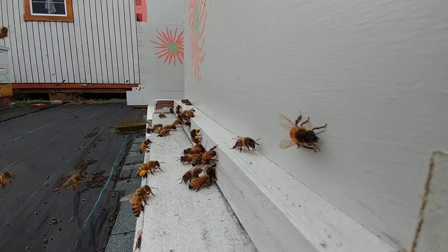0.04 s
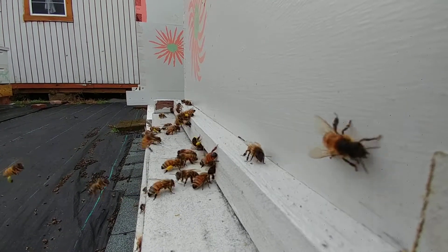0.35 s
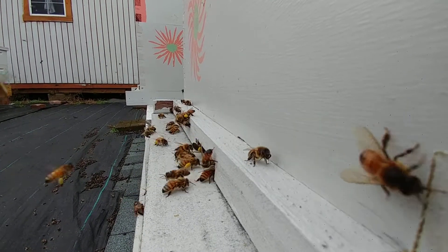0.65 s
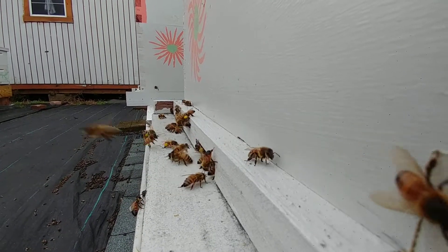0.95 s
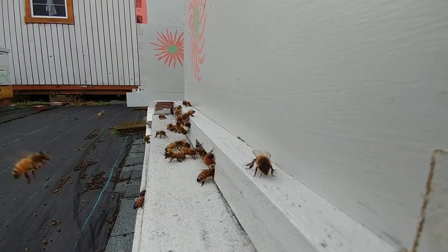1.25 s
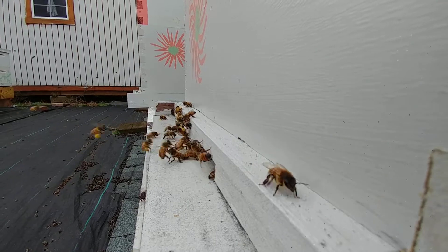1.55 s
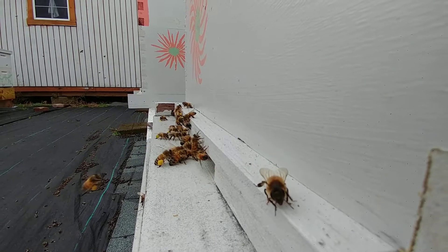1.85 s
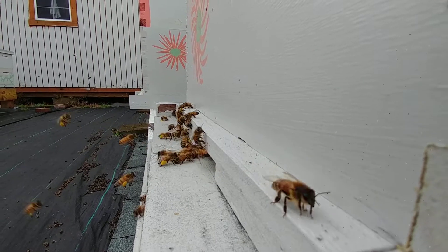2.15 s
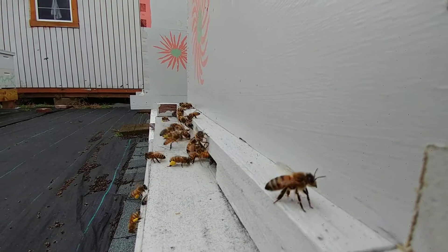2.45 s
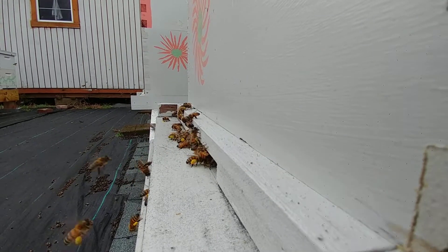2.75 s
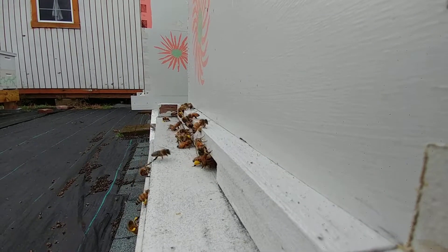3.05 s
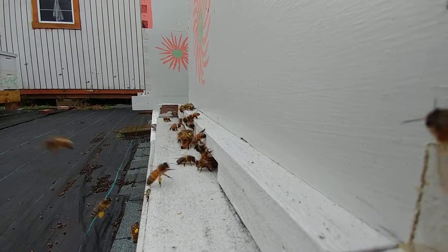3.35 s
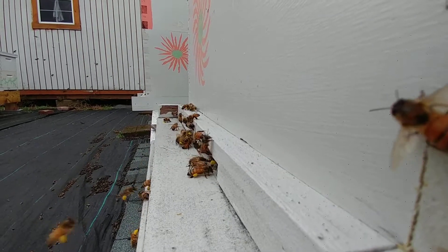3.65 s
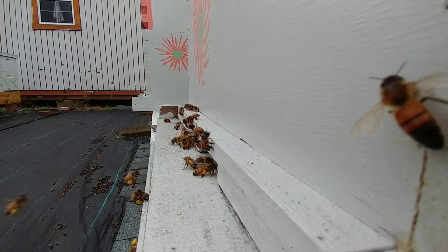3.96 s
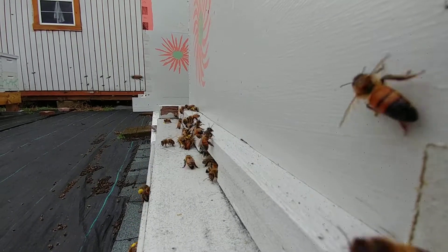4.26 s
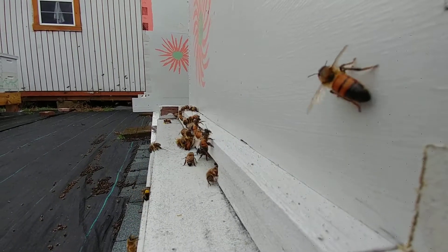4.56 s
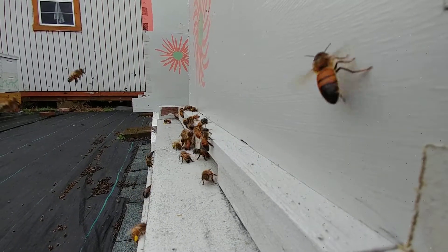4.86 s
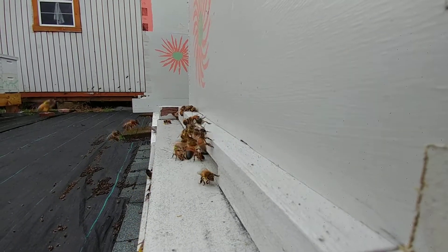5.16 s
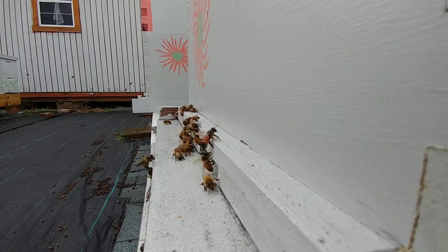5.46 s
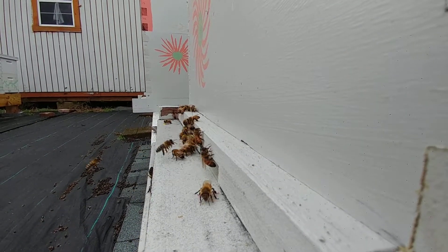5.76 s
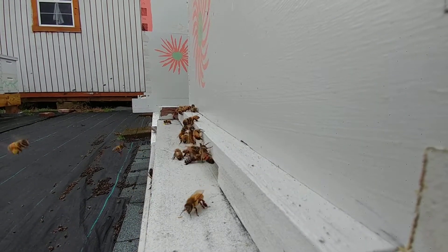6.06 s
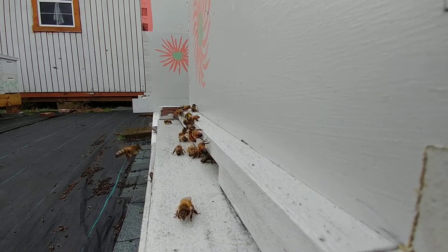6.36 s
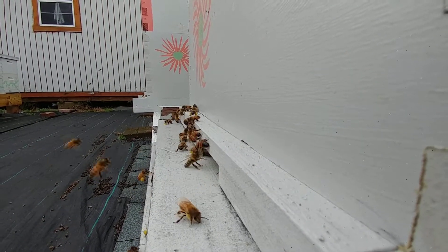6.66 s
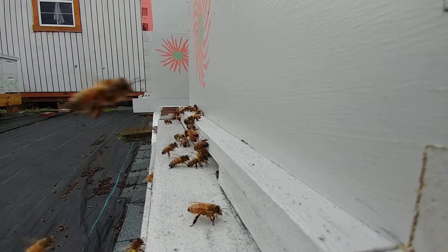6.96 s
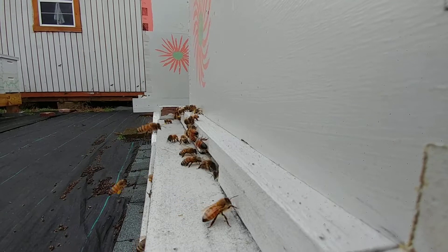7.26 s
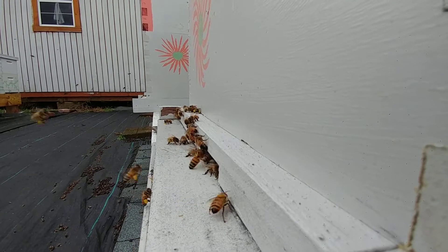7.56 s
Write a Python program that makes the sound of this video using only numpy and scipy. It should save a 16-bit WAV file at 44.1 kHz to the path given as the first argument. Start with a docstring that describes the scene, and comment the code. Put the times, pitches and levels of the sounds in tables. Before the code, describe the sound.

A steady hum of many honeybees outside a hive swells whenever one flies close by, over a faint distant rumble.

```python
"""Honeybees at the hive entrance

A stereo camera rests on the landing board, in a crowd humming at about 215 wingbeats a second.
Single bees swell past the left microphone port, their wings fanning it with puffs of air and a
pulsing hiss. Legs scuff the wood; a far rumble lies below."""
import sys
import numpy as np
from scipy.fft import rfft, irfft, next_fast_len
from scipy.io import wavfile
from scipy.ndimage import uniform_filter1d, map_coordinates

SR = 44100
rng = np.random.default_rng(int(sys.argv[2]) if len(sys.argv) > 2 else 0)


def dump(signal):
    """Clip the signal to [-1, 1] and save it as 16-bit WAV at the path in sys.argv[1]."""
    limited = np.clip(np.atleast_2d(signal).T, -1, 1)
    pcm = np.round(limited * 32767).astype(np.int16)
    wavfile.write(sys.argv[1], SR, pcm)


N = 344862
T = np.arange(N) / SR
PORT_LAG_S = .0005  # travel time from one microphone port to the other


def near_bees(brighten_db_per_db=0.19, bank_db=0.53, bank_rate=13.76):
    """Single flights close to the left port; returns their stereo buzz and their wing strokes."""
    # six flight paths: (time [s], wingbeat [Hz], level [dB])
    leaving = [(0.0, 184.1, -34), (0.118, 162.3, -50), (0.158, 195.8, -42), (0.204, 201, -37),
               (0.242, 189.6, -39), (0.29, 206.3, -38), (0.356, 180.8, -39), (0.422, 170.1, -48),
               (0.45, 170, -55)]
    first_pass = [(.46, 188, -48.5), (.53, 191.1, -43.5), (.62, 207.7, -41.5), (.71, 202, -46.5),
                  (.775, 215.1, -45), (.84, 214.2, -31), (.92, 213.4, -35), (.995, 224.4, -41),
                  (1.11, 208, -46.5)]
    close_pass = [(3.0, 223.6, -53.5), (3.11, 208.2, -38.5), (3.186, 224, -32.5), (3.225, 214.8, -23),
                  (3.278, 204.2, -24.5), (3.305, 209.3, -29.5), (3.33, 207.3, -31), (3.36, 218, -44.5),
                  (3.44, 217.9, -59)]
    darting = [(4.3, 245, -63), (4.35, 230, -56), (4.405, 226, -41), (4.445, 243, -45.5),
               (4.49, 236.4, -52.5), (4.52, 220, -49)]
    landing = [(4.42, 195.2, -41), (4.49, 198.2, -53.5), (4.53, 206.4, -45.5), (4.64, 206, -53.5),
               (4.75, 185, -56.5), (4.89, 176.1, -55), (4.99, 162.3, -46), (5.07, 162, -62)]
    last_pass = [(6.38, 215.4, -59), (6.445, 226.7, -50.5), (6.52, 218.8, -42), (6.595, 230.1, -47),
                 (6.66, 210, -52), (6.72, 228, -67)]
    # each bee's voice: (flight, gain [dB], brightness [dB], jitter [share], rasp [dB], odd lift [dB])
    bees = [(leaving, 4.5, -5, 0.0096, -19, -4.5), (first_pass, 3.5, 0, 0.0076, -12, 0.73),
            (close_pass, 4.6, .5, 0.0044, -15.5, -1.9), (darting, 3.8, -1.4, 0.017, -20, 2.2),
            (landing, 3, 0, 0.016, -13.5, 2.2), (last_pass, 2.7, -4.2, 0.022, -14, 7.6)]
    # what reaches the right port: (frequency [Hz], gain [dB])
    far_port = [(200, -26), (450, -39), (800, -16.5), (1500, -11.5), (4000, -14)]
    left, sideways, strokes = np.zeros((3, N))
    for flight, gain_db, bright_db, jitter, rasp_db, odd_db in bees:
        at, gate = stretch(flight[0][0], flight[-1][0], fade_s=.02)
        pitch_hz, level_db = curves(flight, T[at])
        phase = wingbeat(pitch_hz, jitter)
        strength = gate * amp(level_db + gain_db + 1.3 * wobble(110.7, len(at)))
        # the upper harmonics grow as the bee comes nearer and flare as it banks
        upper_db = bright_db + brighten_db_per_db * (level_db - level_db.max())
        upper_db += bank_db * wobble(bank_rate, len(at))
        # the wings radiate a different mix of harmonics in each direction
        left[at] += strength * buzz(phase, upper_db, rasp_db, odd_db, turning_db=2.5, smear=0.043)
        sideways[at] += strength * buzz(phase, upper_db, rasp_db, odd_db, turning_db=4.5, smear=0.34)
        strokes[at] += gate * stroke_force(phase)
    # the right port hears them later; the low harmonics are near field and fade most on the way
    crossing = lambda hz: amp(along(far_port, hz)) * np.exp(-2j * np.pi * hz * PORT_LAG_S)
    right = filtered(0.71 * left + 0.97 * sideways, crossing)
    return np.array([left, right]), strokes


def wingbeat(pitch_hz, jitter):
    """Phase of the stroke; no two beats last quite as long."""
    return 2 * np.pi * np.cumsum(pitch_hz * (1 + jitter * wobble(70, len(pitch_hz)))) / SR


def stroke_force(phase):
    """Two pushes of air a beat, the down-stroke the stronger."""
    return 0.56 * np.cos(2 * phase) + 0.56 * np.cos(phase)


def buzz(phase, bright_db, rasp_db, odd_db, turning_db, smear):
    """Wingbeat harmonics that shift as the bee turns, plus the rasp of air torn at each stroke."""
    # a wingbeat heard close up: (harmonic [number], level [dB])
    harmonics = [(1, -1.5), (2, 0.5), (3, -9), (4, -13), (5, -12.5), (6, -17.5), (7, -21.5), (8, -27.5),
                 (9, -36), (14, -38.5)]
    # spectrum of the torn air: (frequency [Hz], level [dB])
    rasp_colour = [(250, -12), (600, 6.5), (1300, 1), (2000, -12.5), (2900, -7.5), (4500, -17), (8000, -22)]
    size = len(phase)
    tone = np.zeros(size)
    for k in range(1, 15):
        upper = np.clip((k - 3) / 2, 0, 1)
        odd = k % 2 / k  # unequal up- and down-strokes feed the odd harmonics, the lowest most
        level_db = along(harmonics, k) + bright_db * upper + odd_db * odd
        level_db += turning_db * wobble(15.38, size)
        drift = rng.uniform(0, 2 * np.pi) + smear * k * wobble(55.9, size)
        tone += np.sqrt(2) * amp(level_db) * np.sin(k * phase + drift)
    torn_air = rng.standard_normal(size) * np.exp(0.84 * stroke_force(phase))
    m = next_fast_len(size)
    response = amp(along(rasp_colour, np.fft.rfftfreq(m, 1 / SR)))
    rasp = unit(irfft(rfft(torn_air, m) * response, m)[:size])
    return tone + amp(rasp_db + bright_db) * rasp


def flybys():
    """Bees crossing the entrance: level follows distance and the pitch glides."""
    # (time [s], wingbeat [Hz], glide [share], level [dB], half length [s],
    #  right port gain [dB], brightness [dB])
    crossings = [(1.21, 220, 0.0057, -43, 0.029, -10, 3.5), (1.321, 220, -0.0087, -49.5, .12, -7, 6.5),
                 (1.604, 222.6, 0.0085, -62.5, 0.087, -5, 16), (2.159, 220.6, 0.0074, -50, 0.13, -10, -8),
                 (2.321, 215.7, -.026, -50.5, 0.036, 5.5, 6), (2.45, 226, -0.018, -50.5, .06, -17, 4),
                 (2.683, 220.4, -0.035, -45.5, 0.068, -9, 8.5), (2.751, 214.6, -0.0103, -48, .04, -11, -8),
                 (2.88, 208, -.02, -50, .06, -26, -16), (3.513, 244.5, -0.037, -52, 0.091, -6.5, 0),
                 (4.35, 238, -.029, -66, 0.049, 11, 17), (4.6, 212.8, .021, -50, .08, -5, 9),
                 (5.044, 216.1, -0.011, -49.5, 0.1, -6, 5), (5.33, 245, 0.0062, -49.5, .11, -9.5, 5),
                 (5.7, 227.5, .01, -58, .09, -4, 8), (6.098, 206.4, -.02, -56, .12, -3, -1),
                 (6.54, 192, -.015, -41.5, 0.044, -10, -5), (6.678, 227, -0.021, -65.5, .054, 9, 14),
                 (6.821, 214.2, -.05, -44, .06, -17, -25), (6.997, 222.3, -0.024, -44.5, .035, -16, -2),
                 (7.222, 229.8, -0.011, -51.5, 0.11, -6.5, -21),
                 (7.45, 192.1, -0.038, -52.5, 0.094, -6, -14)]
    out = np.zeros((2, N))
    for s, pitch_hz, glide, level_db, half_s, right_db, bright_db in crossings:
        at, gate = stretch(s - 2 * half_s, s + 2 * half_s, fade_s=.08)
        position = (T[at] - s) / half_s
        phase = wingbeat(pitch_hz * (1 + glide * np.tanh(position)), jitter=0.0202)
        voice = buzz(phase, bright_db - 3, rasp_db=-10, odd_db=2.5, turning_db=1.5, smear=0.24)
        left = gate * amp(level_db) / (1 + position ** 2) * voice
        right = amp(right_db) * np.interp(T[at] - PORT_LAG_S, T[at], left)
        out[:, at] += [left, right]
    return out


def swish(strokes, depth=0.48, flutter_db=2.1, flutter_rate=25):
    """Each wing stroke sheds hiss, which rings in the port near 9 kHz and swells as a bee nears."""
    # wings tearing the air beside the port: (closest at [s], level [dB], approach [s], retreat [s])
    passes = [(.65, -57.5, 0.07, .04), (.825, -50, 0.091, 0.062), (1.1, -57.5, 0.079, 0.11),
              (1.2, -57.5, 0.018, 0.015), (1.35, -63, .04, 0.033), (1.76, -58.5, .02, 0.025),
              (2.59, -61, .04, 0.047), (2.72, -62, .02, 0.044), (2.855, -56.5, .025, 0.034),
              (3.195, -42, 0.066, 0.067), (3.3, -44, 0.048, 0.066), (3.965, -64, 0.016, .025),
              (4.335, -53, 0.035, 0.11), (4.54, -62, 0.065, 0.21), (5.27, -62, 0.3, 0.19),
              (6.5, -60.5, 0.12, 0.039), (6.64, -54.5, 0.058, 0.092), (6.82, -57.5, 0.099, 0.078),
              (7.52, -63, .04, 0.036)]
    # hiss of the wings further off: (time [s], level [dB])
    far_levels = [(0, -63), (2.6, -65), (3.9, -69.5), (4.7, -66.5), (5.8, -68.5), (7.8, -68)]
    # the hiss at the port: (frequency [Hz], level [dB])
    hiss_colour = [(150, 9), (500, 1.5), (1300, -5), (2200, -11.5), (4000, -10.5), (7000, -10.5),
                   (8000, -1), (8900, 5.5), (9600, -1.5), (10500, -22), (12000, -11.5), (15500, -12.5)]
    pulses = np.exp(depth * strokes + 0.16 * wobble(400))
    pulses /= np.sqrt(uniform_filter1d(pulses ** 2, SR // 20))  # even power over 50 ms
    hiss = coloured(rng.standard_normal((2, N)) * pulses, hiss_colour)
    far = amp(curves(far_levels)[0] + flutter_db * wobble(flutter_rate))
    near_power = sum((amp(level_db) * nearness(s, approach_s, retreat_s)) ** 2
                     for s, level_db, approach_s, retreat_s in passes)
    return hiss * np.sqrt(far ** 2 + near_power) * amp([[8.5], [-7.5]])


def nearness(s, approach_s, retreat_s):
    """Near-field gain of a bee closest at time s; it halves approach_s before and retreat_s after."""
    position = (T - s) / np.where(T < s, approach_s, retreat_s)
    return 1 / (1 + position ** 2)


def downwash(wake_db=-19, wake_lengths=3.56):
    """Air fanned by a close bee buffets the left port in short puffs, each inside a weaker wake."""
    # puffs of wing wind: (time [s], level [dB], half length [s])
    puffs = [(.005, -39, 0.015), (0.083, -33.5, 0.013), (0.247, -32, 0.053), (0.411, -38.5, .017),
             (0.63, -39.5, 0.025), (0.725, -33.5, 0.0085), (0.84, -37, 0.031), (1.6, -50, .04),
             (3.167, -21, 0.031), (3.294, -18, .025), (4.507, -40, 0.017), (4.597, -43, 0.041),
             (5.095, -40.5, 0.022), (6.563, -47.5, 0.039), (6.875, -54, 0.041)]
    # wind on the microphone: (frequency [Hz], level [dB])
    puff_colour = [(24, -58), (36, -2), (50, 2), (90, 0), (160, -7.5), (300, -19), (600, -25), (1500, -43),
                   (4000, -97)]
    bell = lambda s, half_s: np.exp(-.5 * ((T - s) / half_s) ** 2)
    strength = sum(amp(level_db) * (bell(s, half_s) + amp(wake_db) * bell(s, wake_lengths * half_s))
                   for s, level_db, half_s in puffs)
    eddies = coloured(rng.standard_normal((2, N)), puff_colour)
    return eddies * strength * amp([[5], [-20]])


def crowd(count=12, pitch_hz=215, spread=.075, wander=.036, swell_db=4):
    """Bees further off, each with its own wandering pitch and distance."""
    # a wingbeat at a distance: (harmonic [number], level [dB])
    harmonics = [(1, 4), (2, 3.5), (3, -13.5), (4, -8.5), (5, -10.5), (6, -17), (7, -19), (9, -23),
                 (14, -25.5), (20, -46.5)]
    # rise and fall of the whole hum: (time [s], level [dB])
    hum_levels = [(0, -46), (.9, -48), (1.9, -52), (2.7, -51), (3.4, -47.5), (4.15, -56.5), (4.5, -47),
                  (4.8, -55), (5.3, -49.5), (5.7, -53.5), (6.7, -51.5), (7.8, -54)]
    out, k = np.zeros((2, N)), np.arange(1, 25)
    for offset in np.linspace(-1, 1, count):
        phase = wingbeat(pitch_hz * (1 + spread * offset + wander * wobble(4)), jitter=0.014)
        # most fly on the open left side, so the right port hears them later
        lag_s = PORT_LAG_S * np.cos(rng.uniform(0, 1.5))
        port_phase = np.outer([0, -2 * np.pi], k) * pitch_hz * lag_s
        gains = amp(along(harmonics, k) + rng.normal(0, 0.29, len(k)))
        partials = gains * np.exp(1j * (rng.uniform(0, 2 * np.pi, len(k)) + port_phase))
        cycle = irfft(np.pad(partials, ((0, 0), (1, 0))), 8192)  # one wingbeat at each port
        index = (phase / (2 * np.pi) % 1 * cycle.shape[1]).astype(int)
        out += cycle[:, index] * amp(swell_db * wobble(2.5) + 2.05 * wobble(12))
    return unit(out) * amp(curves(hum_levels)[0]) * amp([[2], [-2.5]])


def scuffs(width_octaves=0.35):
    """Brief dry scratches of legs and wings on the painted wood."""
    # brushes against the hive: (time [s], level [dB], centre [Hz], length [s])
    brushes = [(0.103, -63, 5130, .031), (2.633, -63.5, 3540, 0.039), (2.755, -64, 12000, .012),
               (3.714, -70, 9000, .012), (4.348, -63, 3330, 0.048), (4.62, -61, 2870, 0.023),
               (5.05, -63, 13300, 0.021), (5.144, -68, 11040, .013), (5.274, -69.5, 2520, 0.091),
               (5.459, -57, 2740, 0.027), (6.488, -63, 6500, 0.037), (6.659, -69, 12000, .099),
               (6.886, -65.5, 7550, 0.069)]
    out = np.zeros(N + SR)
    t = np.arange(SR // 2) / SR
    hz = np.fft.rfftfreq(len(t), 1 / SR)
    for s, level_db, centre_hz, length_s in brushes:
        band = np.exp(-.5 * (np.log2((hz + 1) / centre_hz) / width_octaves) ** 2)
        scratch = unit(irfft(rfft(rng.standard_normal(len(t))) * band, len(t)))
        age = 2 * t / length_s
        start = max(0, round((s - length_s / 2) * SR))
        out[start:start + len(t)] += amp(level_db) * scratch * age * np.exp(1 - age)
    return out[:N] * amp([[2], [-5]])


def outdoors():
    """A far rumble and the faint hiss of open air."""
    # spectra of the rumble and the air: (frequency [Hz], level [dB])
    rumble_colour = [(20, -51), (35, -17), (48, -6), (61, -5), (77, 1), (100, -14), (130, -9), (165, -16.5),
                     (300, -26.5), (700, -28.5), (2000, -52.5)]
    air_colour = [(200, 15), (800, 6), (2000, -1), (4000, -3.5), (7000, -6.5), (8800, -3.5), (10500, -19),
                  (12000, -16), (15500, -9.5)]
    # slow swells of the rumble: (time [s], level [dB])
    rumble_levels = [(0, -43.5), (1.4, -42.5), (1.9, -46.5), (2.3, -45.5), (2.8, -42.5), (3.5, -44),
                     (3.95, -49), (4.6, -46.5), (6.5, -46), (7.4, -48)]
    rumble = ambient(rumble_colour) * amp(curves(rumble_levels)[0])
    return rumble + ambient(air_colour) * amp([[-58], [-62]])


def ambient(spectrum):
    """Diffuse noise at the two ports: alike in the bass, unrelated in the treble."""
    # left-right likeness: (frequency [Hz], correlation [-1 to 1])
    likeness = [(60, 0.94), (130, 0.86), (300, 0.23), (700, 0.21), (1400, -0.55), (3000, -0.022)]
    angle = lambda hz: np.arccos(np.clip(along(likeness, hz), -1, 1)) / 2
    response = lambda hz: amp(along(spectrum, hz)) * [np.cos(angle(hz)), np.sin(angle(hz))]
    mid, side = filtered(rng.standard_normal((2, N)), response)
    return unit(np.array([mid + side, mid - side]))


def amp(db):
    """Decibels to gain."""
    return 10 ** (np.asarray(db) / 20)


def unit(x):
    """Scale to rms 1."""
    return x / np.sqrt(np.mean(x ** 2) + 1e-20)


def along(points, hz):
    """Read (frequency, value) points on a log axis."""
    frequencies, values = np.transpose(points)
    return np.interp(np.log(hz + 1e-3), np.log(frequencies), values)


def curves(rows, t=T):
    """Each column after the time, at the times t."""
    times, *columns = np.transpose(rows)
    return [np.interp(t, times, column) for column in columns]


def stretch(start_s, end_s, fade_s):
    """The samples of a time span with a fade outside each end, and the gate over them."""
    gate = np.clip(np.minimum(T - start_s, end_s - T) / fade_s + 1, 0, 1)
    return np.flatnonzero(gate), gate[gate > 0] ** 2


def wobble(rate, size=N):
    """A smooth random curve, rate knots a second."""
    coarse = np.arange(0, size + 32, 32)
    knots = rng.standard_normal(int(size * rate / SR) + 4)
    smooth = map_coordinates(knots, [coarse * rate / SR], mode="mirror")
    return np.interp(np.arange(size), coarse, smooth)


def filtered(x, response):
    """x through a frequency response."""
    m = next_fast_len(N + SR // 4)
    return irfft(rfft(x, m) * response(np.fft.rfftfreq(m, 1 / SR)), m)[..., :N]


def coloured(x, spectrum):
    """x shaped by a spectrum, at rms 1."""
    return unit(filtered(x, lambda hz: amp(along(spectrum, hz))))


def scene():
    """All the bees over the outdoor background, heard from the landing board."""
    hum, strokes = near_bees()
    return hum + flybys() + crowd() + swish(strokes) + downwash() + scuffs() + outdoors()


def record(dry, low_cut_hz=42, top_hz=15760):
    """The camera cuts the deep bass and keeps nothing above its band limit."""
    return filtered(dry, lambda hz: (hz < top_hz) * np.sqrt(1 - 1 / (1 + (hz / low_cut_hz) ** 10)))


dry = scene()
out = record(dry)
dump(out)
```